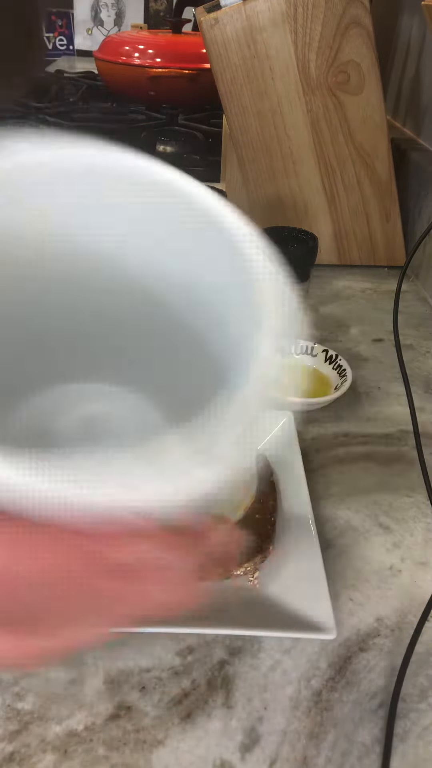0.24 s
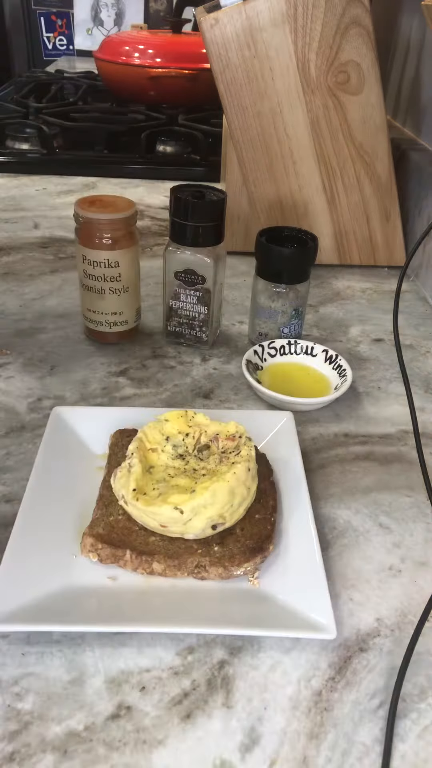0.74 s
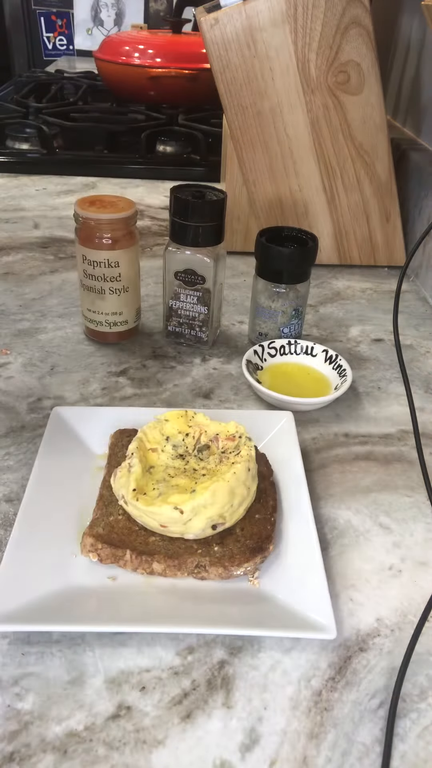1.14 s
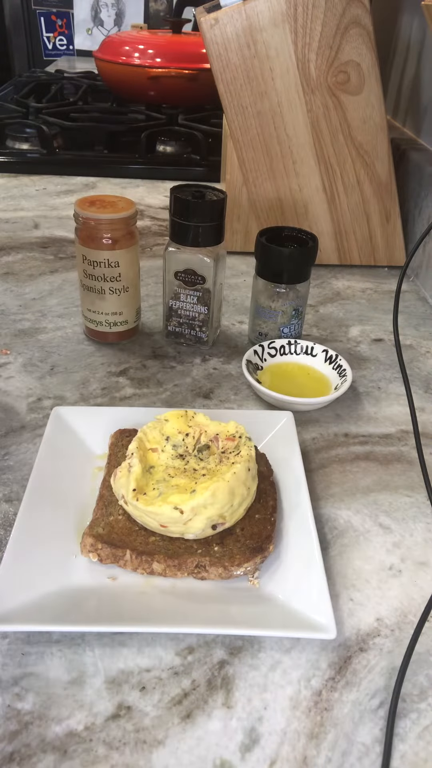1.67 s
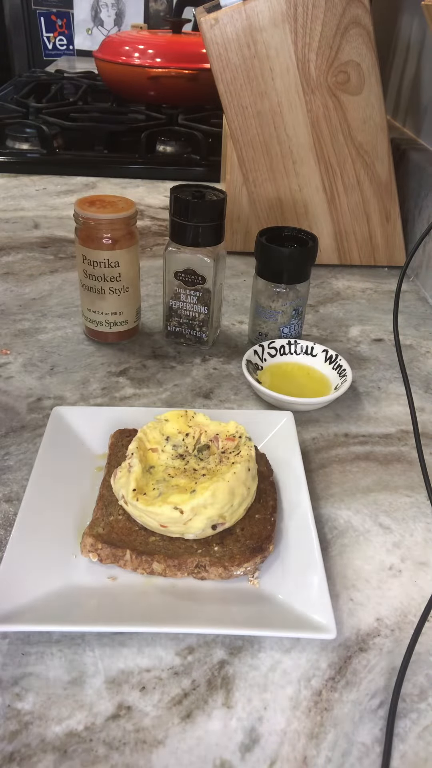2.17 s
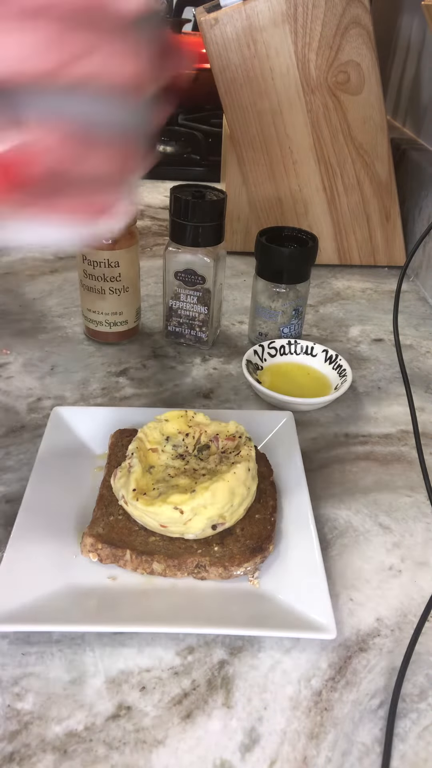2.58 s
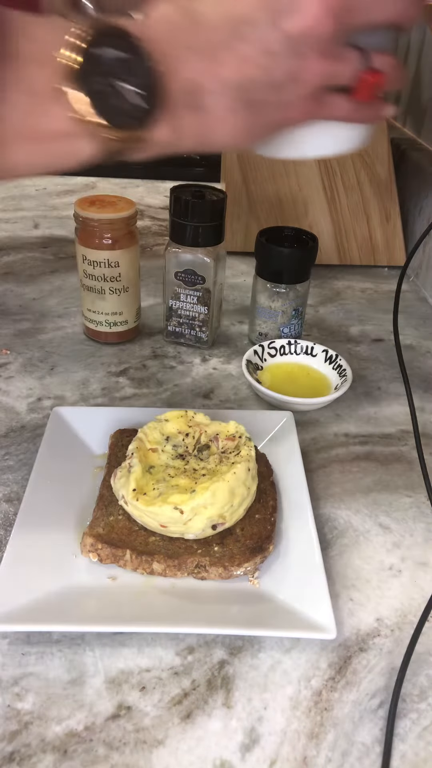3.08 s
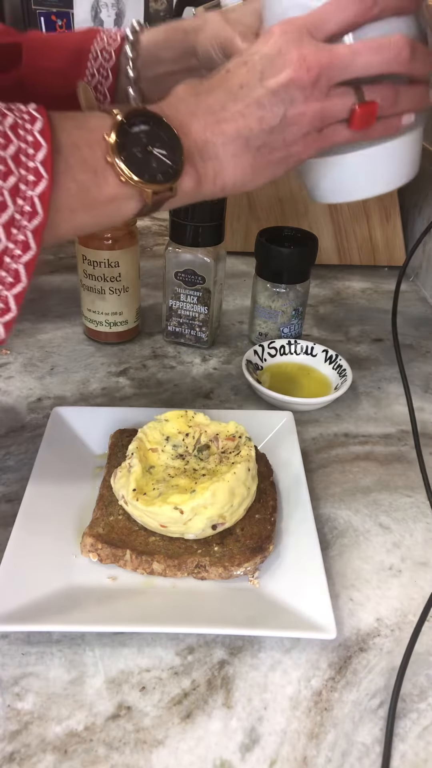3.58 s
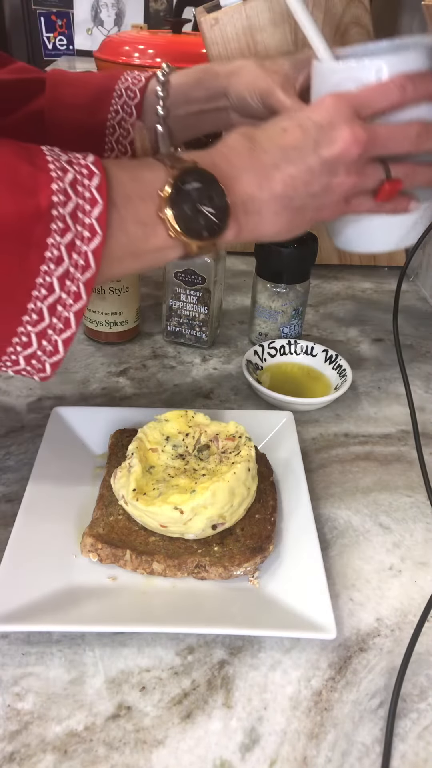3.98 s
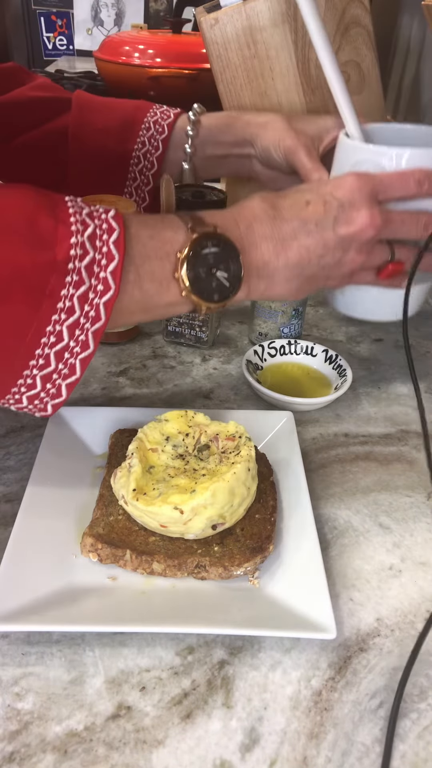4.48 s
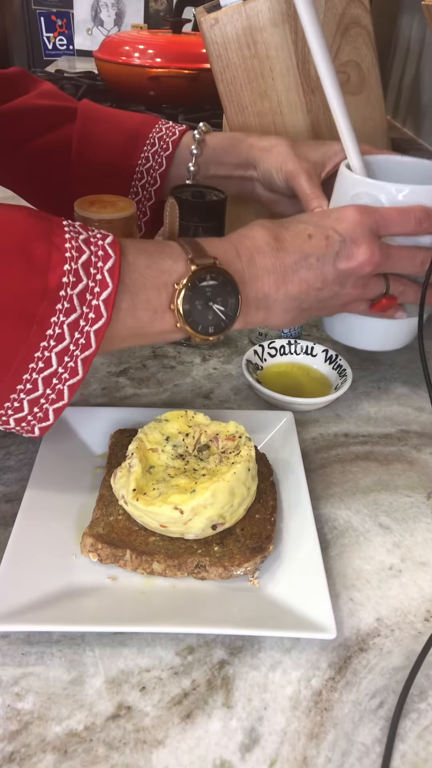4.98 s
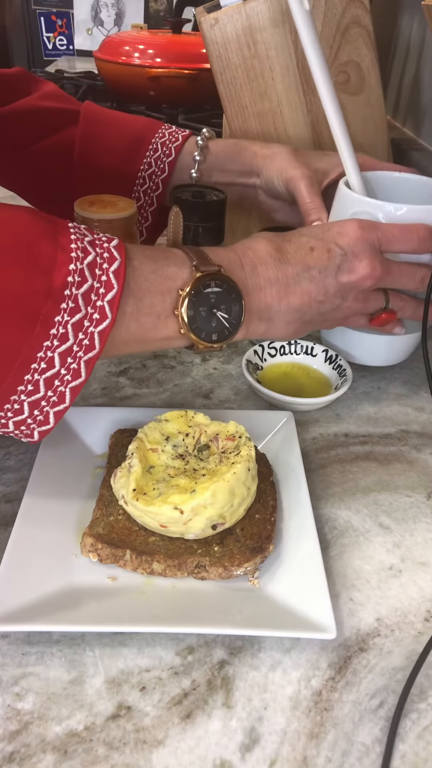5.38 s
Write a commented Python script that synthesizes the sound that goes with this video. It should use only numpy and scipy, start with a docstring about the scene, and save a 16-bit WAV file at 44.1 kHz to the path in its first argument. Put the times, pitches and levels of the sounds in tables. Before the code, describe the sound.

Close by in a small kitchen, a ceramic mug knocks onto a stone counter and wobbles through a run of softer knocks and two hollow scrapes. Faint cloth swishes follow, then a quick cluster of dry clicks from a utensil. Finally the mug comes down with one sharp knock and two small settling taps. A low motor and fan hum continues throughout, and the hard walls add a brief echo.

```python
"""First comes the low hum of an appliance: its motor drones and its fan rushes in a small kitchen.
A ceramic mug is put down on a stone counter, then rocks and scrapes along it, its hollow booming.
Hands pick up a utensil with a few dry clicks, and now and then a sleeve brushes past.
Last, the mug is set down with one hard knock and settles. Each knock rings both the mug and
the stone, and the room answers with a short echo."""
import sys
import numpy as np
from scipy import signal
from scipy.fft import rfft, irfft
from scipy.io import wavfile
from scipy.ndimage import uniform_filter1d

SR = 44100
rng = np.random.default_rng(int(sys.argv[2]) if len(sys.argv) > 2 else 0)


def file_out(sig):
    """Save sig as 16-bit WAV at sys.argv[1]."""
    # one column per channel
    cols = np.atleast_2d(sig).T
    # limit, then scale
    lim = np.clip(cols, -1, 1)
    pcm = np.round(lim * 32767).astype(np.int16)
    wavfile.write(sys.argv[1], SR, pcm)


N = 270333
T = np.arange(N) / SR


def undb(db):
    """Turn decibels into a number to multiply by."""
    return 10 ** (np.asarray(db) / 20)


def unit(x):
    """Scale a sound so its average strength (rms) is 1."""
    return x / np.sqrt(np.mean(x ** 2))


def fade(t, fade_s):
    """Die away smoothly; every fade_s in this file is the time taken to drop 60 dB."""
    return np.exp(-np.log(1000) * t / fade_s)


def convolve(x, response):
    """Play a sound through an object or room, given its response to one tiny tap."""
    return signal.fftconvolve(x, response)[:N]


def colour(x, tone):
    """Make each pitch louder or softer by rows of (pitch_hz, level_db); the result has strength 1."""
    hz, db = np.transpose(tone)
    pitches = np.maximum(np.fft.rfftfreq(N, 1 / SR), 1)
    gain = undb(np.interp(np.log(pitches), np.log(hz), db))
    return unit(irfft(rfft(x) * gain, N))


def noise(tone):
    """A steady hiss with the given tone, at strength 1."""
    return colour(rng.standard_normal(N), tone)


def wander(turns_per_s):
    """A value that drifts at random, mostly between -1 and 1."""
    turns = np.arange(0, T[-1] + 1, 1 / turns_per_s)
    return np.interp(T, turns, rng.standard_normal(len(turns)))


def ring(notes, build_cycles):
    """A tapped object: each of its notes swells over its first cycles, then dies away."""
    t, sound = T[:SR], 0
    for k, (hz, db, fade_s) in enumerate(notes):
        swell = 1 - np.exp(-t * hz / build_cycles)
        sound += (-1) ** k * undb(db) * np.sin(2 * np.pi * hz * t) * fade(t, fade_s) * swell
    return sound


def burst(tone, fade_s, rise_s):
    """A short crack of noise with energy 1, evened out so that it follows its tone smoothly."""
    hz, db = np.transpose(tone)
    t = T[:SR]
    spectrum = rfft(rng.standard_normal(SR) * fade(t, fade_s) * (1 - np.exp(-t / rise_s)))
    spectrum /= np.sqrt(uniform_filter1d(np.abs(spectrum) ** 2, size=50) + np.finfo(float).tiny)
    gain = undb(np.interp(np.log1p(np.arange(len(spectrum))), np.log(hz), db))
    crack = irfft(spectrum * gain, SR) * (t < .5)
    return crack / np.sqrt(np.sum(crack ** 2))


# the motor's steady notes: pitch_hz, level_db
MOTOR_NOTES = [(118.4, -70), (236.9, -68), (292, -67), (352, -81.5), (468.3, -78), (1114, -81.5),
               (1233, -81.5), (1292, -80), (3521, -93.5), (3758, -93), (4581, -95)]
# the tone of the fan: pitch_hz, level_db
FAN_TONE = [(25, -38.5), (42, -12.5), (62, 1.5), (85, -1.5), (115, 4.5), (200, 1), (290, -7), (400, -11.5),
            (800, -16.5), (1300, -22.5), (1600, -27), (3000, -31.5), (7500, -35.5), (9000, -41),
            (16000, -42.5)]


def appliance(waver_db=2, drift_hz=1.317, fan_db=-56.5):
    """A motor hums, each note a little unsteady, over the soft rush of a fan."""
    motor = 0
    for hz, db in MOTOR_NOTES:
        height = np.sqrt(2) * undb(db + waver_db * wander(13))
        pitch_hz = hz + drift_hz * wander(8.1)
        motor += height * np.sin(2 * np.pi * np.cumsum(pitch_hz) / SR)
    return motor + undb(fan_db) * noise(FAN_TONE)


# how long the room holds each pitch: pitch_hz, fade_s
ROOM_FADES = [(100, 0.31), (600, 0.48), (2400, 0.54), (3300, 0.11), (6000, 0.47), (15000, 0.21)]
# more echo is heard when the action moves to the back of the counter: time_s, level_db
ECHO_LEVELS = [(2, -20), (3, -13.5), (5.4, -18.5)]


def kitchen_echo(sound, gap_s=0.0051):
    """The hard walls of a small room send the sound back as a short blur."""
    hz, fade_s = np.transpose(ROOM_FADES)
    t, tail = T[:SR], 0
    edges_hz = np.geomspace(50, 16000, 9)
    for low, high in zip(edges_hz, edges_hz[1:]):
        band_filter = signal.butter(3, [low, high], "band", fs=SR, output="sos")
        band = signal.sosfilt(band_filter, rng.standard_normal(SR))
        tail += band * fade(t, np.interp(np.log(low * high) / 2, np.log(hz), fade_s))
    tail *= np.clip(t / gap_s - 1, 0, 1)
    amount = undb(np.interp(T, *np.transpose(ECHO_LEVELS)))
    return convolve(amount * sound, tail / np.sqrt(np.sum(tail ** 2)))


# each brush of the sleeve: middle_s, level_db, half_length_s
SLEEVE_BRUSHES = [(0.844, -66.5, 0.015), (1.112, -66.5, 0.012), (1.595, -69, 0.014), (2.309, -65.5, 0.008),
                  (2.431, -59.5, 0.015), (3.107, -58, 0.044)]
# the tone of cloth: pitch_hz, level_db
CLOTH_TONE = [(1000, -5.5), (2500, 2.5), (6000, 2.5), (8500, -6), (11000, -2.5), (14000, -5), (16000, 0)]


def sleeve():
    """Cloth brushes past in short, soft swishes."""
    swishes = sum(undb(db) * np.exp(-((T - middle_s) / half_s) ** 2)
                  for middle_s, db, half_s in SLEEVE_BRUSHES)
    return noise(CLOTH_TONE) * swishes


# a utensil and jewellery being handled: start_s, clack_db, tick_db
HANDLING_CLICKS = [(0.6207, -64, -51), (3.0606, -40.5, -41), (3.0906, -40.5, -53), (3.157, -52.5, -66),
                   (3.206, -45, -48.5), (3.22, -43, -60), (3.291, -53.5, -69), (3.3875, -45.5, -83),
                   (3.412, -58, -67)]
# the tones of the utensil's clack, its sharp tick and the hand's thump: pitch_hz, level_db
CLACK_TONE = [(200, -23), (700, -3.5), (1150, 0.5), (1700, -5), (2400, -1), (3000, -6), (3900, -4),
              (5500, -33.5), (8000, -40), (15000, -60)]
TICK_TONE = [(1000, -47), (3000, -14), (4500, 4.5), (6500, 4), (9000, -6), (13000, -5), (16000, -6)]
THUMP_TONE = [(40, -22), (90, 1.5), (220, 13.5), (380, 1.5), (600, -3.5), (1200, -12.5), (4000, -81)]
# the utensil's own notes: pitch_hz, level_db, fade_s
UTENSIL_NOTES = [(1130, 4, 0.018), (1300, 9, 0.015), (2090, -4, 0.027), (2430, -30, .045), (3130, -16, .09),
                 (3770, -28, 0.053), (5400, 13, 0.057)]


def utensil(click_rise_s=0.0023, thump_rise_s=0.013, firmest_thump_db=-32.5, clack_db=-2, ring_db=-4):
    """Dry clicks ring the utensil briefly; the firmer ones carry a low thump of the hand."""
    clack, tick, thump = noise(CLACK_TONE), noise(TICK_TONE), noise(THUMP_TONE)
    clacks, ticks, thumps = np.zeros((3, N))
    t = T[:SR // 2]
    click_shape = np.minimum(t / click_rise_s, 1) * fade(np.maximum(t - click_rise_s, 0), fade_s=0.043)
    thump_shape = np.minimum(t / thump_rise_s, 1) * fade(t, fade_s=0.12)
    firmest_db = max(row[1] for row in HANDLING_CLICKS)
    for start_s, firmness_db, tick_db in HANDLING_CLICKS:
        span = slice(int(start_s * SR), int(start_s * SR) + len(t))
        thump_db = firmest_thump_db + 3.3 * (firmness_db - firmest_db)  # light clicks hardly thump
        clacks[span] += click_shape * undb(firmness_db) * clack[span]
        ticks[span] += click_shape * undb(tick_db) * tick[span]
        thumps[span] += thump_shape * undb(thump_db) * thump[span]
    ringing = unit(convolve(clacks, ring(UTENSIL_NOTES, build_cycles=1))) * np.std(clacks)
    return undb(clack_db) * clacks + undb(ring_db) * ringing + ticks + thumps


# the mug's notes, from its hollow up to the fine rings of its wall: pitch_hz, level_db, fade_s
MUG_NOTES = [(628, -17, .08), (690, -29, .07), (1065, -38, .12), (1149, -32, .13), (1264, -28, .09),
             (1805, -27, .045), (2030, -35, .03), (2425, -36, .11), (2520, -23, .03), (3860, -44, .05),
             (4576, -49, .08), (5020, -47, .08), (5577, -43, .1), (7537, -42, .09), (9036, -30, .13),
             (9690, -42, .09), (12834, -39, .12), (15692, -52, .1)]


def mug_ring():
    """One tap on the mug: the air inside booms and the ceramic wall rings."""
    return ring(MUG_NOTES, build_cycles=2.5)


# each push of the mug over the stone: start_s, end_s, firmest_s, firmest_db
MUG_PUSHES = [(1.084, 1.583, 1.453, -40.5), (1.74, 1.96, 1.886, -40.5)]


def push_loudness(swell_share, swell_db=9, swell_half_s=0.065, rise_s=0.014, stop_s=0.048):
    """Each push starts, swells to its firmest moment and stops; swell_share scales the swell."""
    gain = np.zeros(N)
    for start_s, end_s, firmest_s, firmest_db in MUG_PUSHES:
        moving = np.interp(T, [start_s, start_s + rise_s, end_s, end_s + stop_s], [0, 1, 1, 0])
        slack = 1 - np.exp(-((T - firmest_s) / swell_half_s) ** 2)
        gain += moving * undb(firmest_db - swell_share * swell_db * slack)
    return gain


# the tones of the rubbing foot, the grit under it and the rumbling slab: pitch_hz, level_db
RUB_TONE = [(100, 15), (560, -1), (720, 3), (1100, -13.5), (1800, -13.5), (2500, -23.5), (4000, -13),
            (9000, -66)]
GRIT_TONE = [(1500, -16), (3000, 4.5), (5500, 2.5), (7500, -3), (9000, -4), (9700, -5), (13000, 2.5),
             (16000, 12)]
SLAB_TONE = [(50, -12), (110, 7), (220, 4.5), (380, 13.5), (520, 5), (750, 10.5), (1000, -3), (1600, -10),
             (3000, -17), (8000, -38.5)]


def mug_scrape(mug, slips_per_s=900, spread_db=2.0, boom_db=-1.5, grit_db=-32, rumble_db=-6):
    """The unglazed foot catches and slips: tiny jerks boom in the hollow, grit makes the wall sing."""
    slipping = rng.random(N) < slips_per_s / SR
    slips = slipping * undb(spread_db * rng.standard_normal(N)) * rng.choice([-1, 1], N)
    boom = unit(convolve(colour(slips, RUB_TONE), mug)) * undb(boom_db)
    sing = unit(convolve(colour(slips, GRIT_TONE), mug)) * undb(grit_db)
    rumble = colour(slips, SLAB_TONE) * undb(rumble_db)
    return boom * push_loudness(1) + sing * push_loudness(0.4) + rumble * push_loudness(0.7)


def knock_force(start_s, hardness_hz, grit_db):
    """One contact: a softer one lasts longer and has less treble; grit adds a tiny sharp edge."""
    tap = signal.unit_impulse(SR // 40)
    soften = signal.butter(4, min(hardness_hz, SR / 4), fs=SR, output="sos")
    force, first = np.zeros(N), int(start_s * SR)
    force[first:first + len(tap)] = signal.sosfilt(soften, tap) + undb(grit_db) * tap
    return force


# the mug's foot meets the stone: start_s, mug_db, counter_db, hardness_hz (higher is brighter)
MUG_KNOCKS = [(0.986, -2.5, -12, 3160), (1.0371, -10, -15, 950), (1.0978, -8.5, -16, 1680),
              (1.134, -9, -22, 830), (1.333, -22, -22, 800), (1.353, -15.5, -19, 870),
              (1.413, -12, -23, 780), (1.458, -12, -11.5, 2180), (1.5165, -6.5, -34, 640),
              (1.5575, -4.5, -32, 620), (1.648, -7.5, -20.5, 1085), (1.764, -4, -42, 554),
              (1.857, -22, -37, 716), (5.5, -0.5, 2, 4960), (5.63, -16.5, -19, 955), (5.651, -11, -19, 750)]
# the stone counter's notes: pitch_hz, level_db, fade_s
COUNTER_NOTES = [(205, -28, .09), (296, -28, .06), (353, -37, .18), (393, -25, .12), (530, -39, .16),
                 (645, -34, .28), (795, -30, .16), (945, -31, .06), (1100, -28, .09), (1398, -31, .16),
                 (1482, -33, .14), (1625, -24, .025), (1946, -35, .11), (2490, -31, .1), (2705, -25, .05),
                 (3150, -21, .025), (4010, -39, .04)]
# the tones of the glaze's snap and the stone's crack: pitch_hz, level_db
SNAP_TONE = [(600, 1.5), (1300, 7.5), (2100, 14.5), (2650, 10.5), (3200, -2), (4300, -1.5), (6000, -20),
             (15000, -35)]
CRACK_TONE = [(60, -46.5), (150, -3.5), (600, 10), (1600, 5.5), (2800, -3), (3400, -5), (4200, -8.5),
              (6000, -24), (8000, -6.5), (15000, -26)]


def mug_knocks(mug, snap_db=-3, crack_db=2.5, scatter_db=-9,
               bounce_above_hz=2500, bounce_s=0.022, bounce_db=-10, bounce_hardness_hz=1280,
               cabinet_hz=105.4, cabinet_db=-32, cabinet_fade_s=0.3, cabinet_hardness_hz=1800):
    """Each knock rings the mug and the counter, and the cabinet booms under the mug's weight."""
    on_mug, on_counter, on_cabinet = np.zeros((3, N))
    for start_s, mug_db, counter_db, hardness_hz in MUG_KNOCKS:
        grit_db = -38.5 + 2.5 * np.log2(hardness_hz / 1000)  # harder knocks are grittier
        force = knock_force(start_s, hardness_hz, grit_db)
        on_mug += undb(mug_db) * force
        on_counter += undb(counter_db) * force
        cabinet_share = min(hardness_hz / cabinet_hardness_hz, 1) ** 2  # soft knocks barely reach it
        on_cabinet += undb(mug_db) * force * cabinet_share
        if hardness_hz > bounce_above_hz:  # a hard knock bounces once, weaker and softer
            bounce = knock_force(start_s + bounce_s, bounce_hardness_hz, grit_db)
            on_counter += undb(counter_db + bounce_db) * bounce
    snap = undb(snap_db) * burst(SNAP_TONE, fade_s=0.038, rise_s=0.0016)
    crack = undb(crack_db) * burst(CRACK_TONE, fade_s=0.041, rise_s=0.00069)
    # the crack scatters off things standing nearby
    scatter = undb(scatter_db) * burst(CRACK_TONE, fade_s=0.11, rise_s=0.011)
    counter = ring(COUNTER_NOTES, build_cycles=1.2)
    cabinet = ring([(cabinet_hz, cabinet_db, cabinet_fade_s)], build_cycles=1.8)
    return (convolve(on_mug, mug + snap)
            + convolve(on_counter, crack + scatter - counter)
            + convolve(on_cabinet, cabinet))


def scene():
    """Mug, utensil and sleeve with their echo, over the hum, in one channel."""
    mug = mug_ring()
    direct = mug_knocks(mug) + mug_scrape(mug) + utensil() + sleeve()
    return (direct + kitchen_echo(direct) + appliance())[None]


def record(dry, bass_hz=42, top_hz=15900):
    """The microphone sheds the deep bass, and the highest treble is cut."""
    thin = signal.sosfilt(signal.butter(2, bass_hz, "high", fs=SR, output="sos"), dry)
    return signal.sosfilt(signal.ellip(10, .2, 70, top_hz, fs=SR, output="sos"), thin)


dry = scene()
out = record(dry)
file_out(out)
```